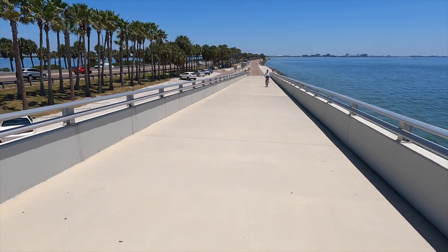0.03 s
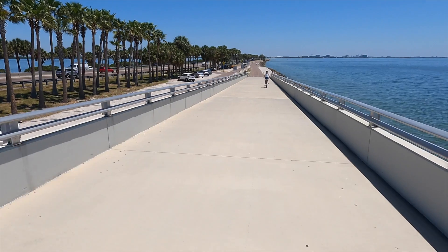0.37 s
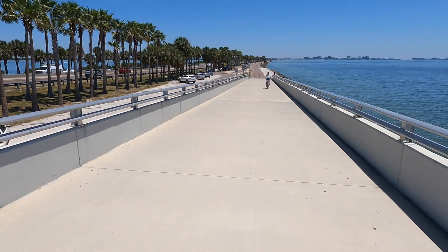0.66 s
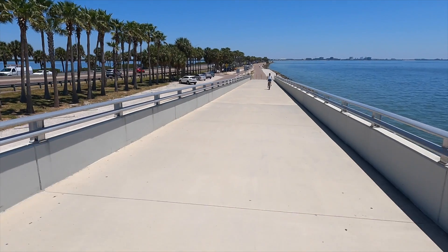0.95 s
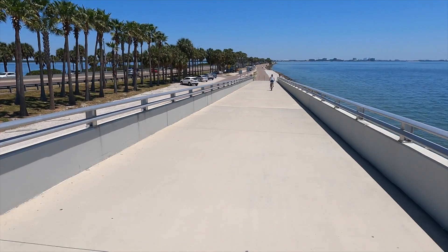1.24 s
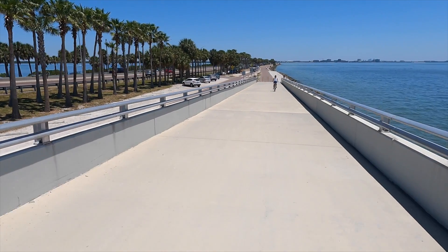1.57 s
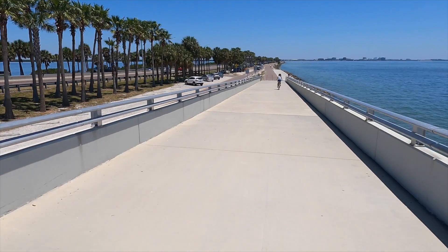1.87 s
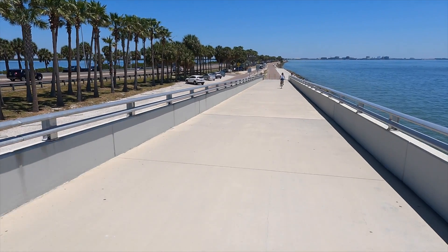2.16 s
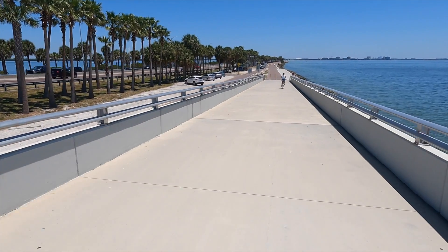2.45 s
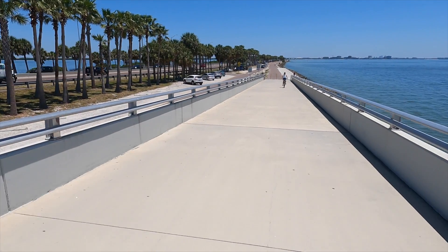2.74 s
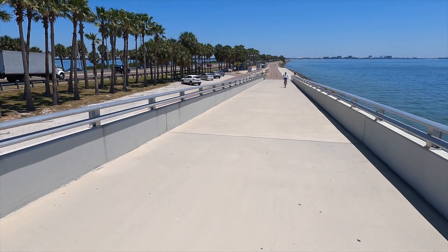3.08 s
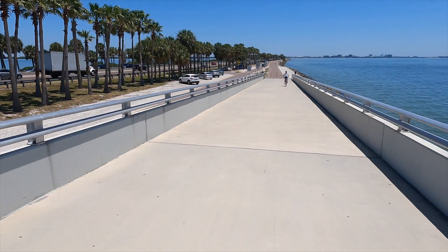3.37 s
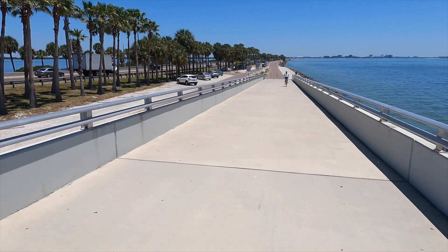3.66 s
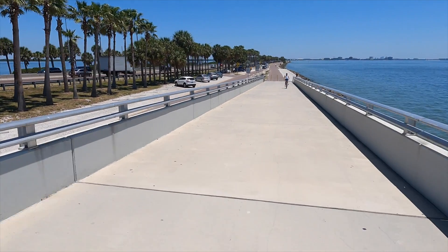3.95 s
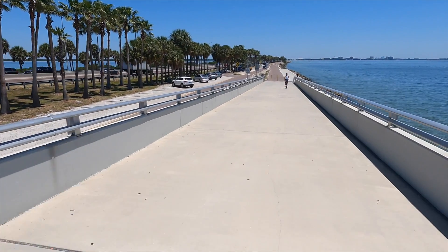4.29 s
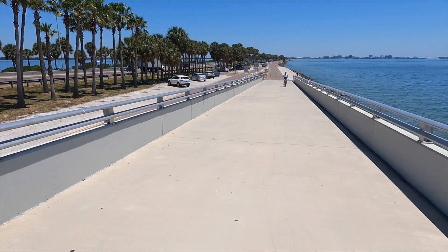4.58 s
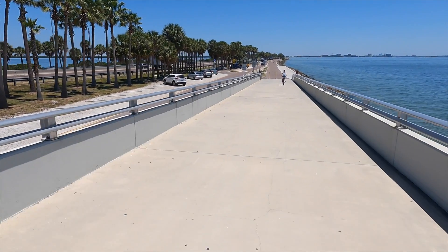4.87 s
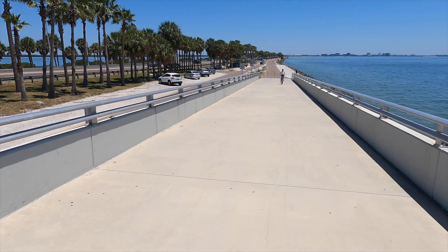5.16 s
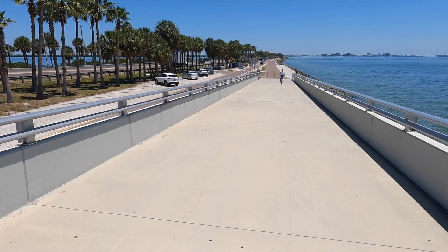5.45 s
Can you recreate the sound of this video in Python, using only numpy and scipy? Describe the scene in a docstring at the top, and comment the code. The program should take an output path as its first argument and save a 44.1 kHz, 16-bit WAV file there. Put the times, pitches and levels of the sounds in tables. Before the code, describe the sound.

Inline skates roll on an outdoor concrete path for about five and a half seconds, heard from a microphone moving with the skater. The wheels give a continuous grainy rumble with a ringing rasp, light hiss and a faint wavering hum that sinks slightly. Throughout, wind buffets the microphone in deep, irregular, throbbing gusts.

Light clicks from the gear come between 0.5 and 1.6 seconds, and the wheels clatter quickly over a slab joint around 1.3 seconds, with dull thuds and small metallic clacks. The rolling then runs evenly, with faint bumps near 2.7 and 4 seconds, and eases a little after 4.3 seconds. One loud, sharp click sounds at about 4.9 seconds, followed by a second brief clatter at 5.2 seconds. From 5 seconds a faint, thin whistle wavers and falls slightly, while the wind keeps gusting to the end.

```python
"""On a concrete seaside path, inline skates roll along, heard from a camera riding with the skater.
The grainy concrete shakes the wheels and keeps the gear ringing, over a hum that sinks as they slow.
The wheels clatter over slab joints, the gear clicks (once loudly), and a thin whistle comes up
at the end. All the while, gusts of wind buffet the microphone."""
import sys
import numpy as np
from scipy import signal
from scipy.fft import rfft, irfft, next_fast_len
from scipy.io import wavfile
from scipy.ndimage import map_coordinates

SR = 44100
rng = np.random.default_rng(int(sys.argv[2]) if len(sys.argv) > 2 else 0)


def master(y):
    """Save y as 16-bit WAV."""
    cut = np.clip(np.atleast_2d(y).T, -1, 1)
    pcm = np.round(cut * 32767)  # scale
    wavfile.write(sys.argv[1], SR, pcm.astype(np.int16))


N = 247842

# how hard the concrete shakes the wheels: (time [s], level [dB])
SHAKING = [(0, -1), (.3, -1), (.45, 1), (.84, -2.5), (.94, 1.5), (1.15, 3), (1.45, 1), (1.6, 4), (2.3, 1),
           (3.05, 0.5), (3.4, -1.5), (4.3, 0), (4.7, -5), (5.08, 1), (5.3, -2), (5.6, -0.5)]
# the rolling sound drifts between two tones: (time [s], share of the second tone [0-1])
TONE_DRIFT = [(0, 0), (1.5, 0), (2.6, 0.63), (4.3, 0.6), (5.1, 0.8), (5.6, 0.9)]
# the low rumble of rolling: (frequency [Hz], level [dB])
RUMBLE_SPECTRUM = [(70, -10.5), (140, 4), (220, 3.5), (265, 0), (315, 3.5), (400, -2.5), (500, -4),
                   (680, 0), (790, 1.5), (900, -13.5), (1300, -29.5)]
# where the gear rings, low to high: (frequency [Hz], width [Hz], first tone [dB], second tone [dB])
RING_BANDS = [(973, 94, -6, -5), (1035, 30, 1.5, -0.5), (1090, 28.3, 2, 4.5), (1136, 62, -8.5, -8.5),
              (1388, 160, -14.5, -13), (1524, 57, -10, -13.5)]
RASP_BANDS = [(1750, 140, -3.5, -2.5), (1900, 70, -14, -1), (2052, 51, 3.5, -11), (2170, 190, -9, -6),
              (2493, 160, -0.5, -3), (3020, 160, -6.5, 0), (3157, 140, -3, -4.5)]
HISS_BANDS = [(3480, 310, -3.5, -3), (3880, 130, -4, -7), (4307, 150, 0.5, -3), (4640, 190, -1, 3),
              (4900, 240, -12.5, -1.5), (5473, 160, -0.5, 3.5), (6215, 130, -10, -3),
              (6610, 220, -13.5, -8.5), (6900, 260, -18.5, -10), (7480, 170, -17.5, -9.5)]
# a narrow whine in the rolling noise: (time [s], level [dB])
WHINE_LEVELS = [(0, -51), (.9, -60), (1.15, -52.5), (1.55, -57.5), (1.8, -67.5), (2.5, -66.5), (2.9, -51.5),
                (3.25, -60.5), (3.5, -53.5), (3.88, -50.5), (4.2, -52.5), (4.4, -48.5), (4.7, -56.5),
                (5, -54.5), (5.6, -64)]
# the tone of that whine: (frequency [Hz], level [dB])
WHINE_SPECTRUM = [(1900, -40.5), (2150, -12.5), (2240, -1), (2315, 0), (2400, -5), (2480, -14),
                  (2750, -37.5)]
# a wheel hits a joint or bump: (time [s], thud [dB], clack [dB], scuff [dB], time to fade 60 dB [s])
JOINT_HITS = [(0.915, -34, -44.5, -54, 0.029), (1.142, -37, -37.5, -51, 0.11),
              (1.261, -42, -46, -42.5, 0.038), (1.265, -33, -39.5, -40, 0.046),
              (1.28, -35.5, -37, -45, 0.066), (1.296, -34, -31, -44, 0.051),
              (1.306, -27.5, -30, -41, 0.028), (1.3115, -23.5, -34.5, -43.5, 0.047),
              (1.315, -31, -29, -37.5, 0.025), (1.32, -31.5, -32, -37.5, 0.03),
              (1.339, -29.5, -34, -46.5, 0.076), (1.347, -33, -39, -46, 0.055),
              (1.5167, -36.5, -40, -51, 0.027), (1.527, -34, -34.5, -53, 0.029),
              (1.6175, -33.5, -34, -56.5, 0.03), (1.622, -44, -36.5, -57, 0.022),
              (2.716, -47, -56, -50, 0.08), (4.023, -38, -49, -47, 0.07), (5.192, -29, -42.5, -42, .03),
              (5.198, -44.5, -38, -44, .04), (5.2117, -23, -32, -40.5, 0.032),
              (5.2239, -23.5, -33, -39, 0.035), (5.229, -33, -31.5, -36, 0.051),
              (5.2375, -34.5, -33, -41, 0.032), (5.2442, -30, -29, -40, .035),
              (5.252, -44.5, -32.5, -44.5, 0.06)]
# the three parts of such a hit: (frequency [Hz], level [dB])
THUD_SPECTRUM = [(80, -30), (170, 5), (320, -7), (560, -6.5), (900, -13.5), (2000, -34.5)]
CLACK_SPECTRUM = [(500, -31), (850, -9), (1100, 7), (1320, -5), (1550, 1.5), (2000, -4.5), (2450, -0.5),
                  (2800, -9.5), (3150, -4.5), (3700, -22)]
SCUFF_SPECTRUM = [(2200, -27.5), (2950, -6), (3300, -0.5), (3600, -6), (4000, -7), (4400, 1.5), (4720, -5),
                  (4950, -6.5), (5400, 1), (5780, -12), (6080, -2), (6300, -9.5), (6520, -7.5), (7200, -13),
                  (7620, -10.5), (8200, -24.5), (9500, -31.5), (11000, -45)]
# knocks on a wheel frame, and clicks of the gear: (time [s], level [dB], treble tilt [dB per octave])
FRAME_KNOCKS = [(1.263, -41, -14), (1.305, -40, -1), (1.315, -46.5, 10), (1.321, -44.5, -2),
                (5.227, -40.5, 12), (5.2464, -32.5, -3.5)]
GEAR_CLICKS = [(0.503, -27, -10), (1.011, -23.5, -8), (1.241, -24.5, -7), (1.524, -23, -8),
               (1.622, -24.5, -8), (4.865, -14, -0.5), (4.88, -35, 4.5), (4.923, -30.5, -3)]
# the notes a knock and a click ring with: (frequency [Hz], level [dB], time to fade 60 dB [s])
FRAME_NOTES = [(3060, -9, .04), (3340, -8, .045), (4440, -9, .05), (4640, 0, .06), (6130, -11, .04),
               (6520, -15, .045), (7520, -17, .035)]
CLICK_NOTES = [(650, -16.5, 0.045), (1059, 3, 0.023), (1590, -11, 0.024), (2280, -16, 0.024),
               (2660, -13.5, 0.024), (2800, -15.5, 0.034), (3140, -8.5, 0.033), (4500, -17.5, .014),
               (4900, -19, 0.014), (5250, -27, .016), (5530, -24, 0.03), (7600, -32, 0.01)]
# the hum of the wheels: (time [s], low note [dB], its octave [dB])
HUM_LEVELS = [(0, -73, -68), (.45, -58, -73.5), (.93, -51.5, -62.5), (1.5, -48.5, -59), (1.9, -60, -57.5),
              (2.35, -49.5, -57), (3, -59, -58), (4.2, -61, -55), (4.6, -54.5, -67), (5.6, -81.5, -69.5)]
# the thin whistle: (time [s], pitch [Hz], level [dB])
WHISTLE_PATH = [(5, 3130, -75), (5.06, 3110, -57), (5.11, 3050, -52.5), (5.18, 3028, -61),
                (5.26, 3020, -57), (5.3, 2941, -57), (5.34, 2925, -54), (5.385, 2946, -51.5),
                (5.425, 2972, -56), (5.47, 2942, -56), (5.53, 2908, -62), (5.6, 2885, -57)]
# the wind's steady push between gusts, and its flutter: (time [s], level [dB])
WIND_LEVELS = [(0, -15), (.26, -29.5), (.46, -27), (.56, -38), (.7, -28.5), (1.2, -24), (1.39, -30.5),
               (1.52, -25), (1.8, -25), (2.45, -31), (2.85, -26.5), (3.1, -30), (3.5, -26.5), (3.88, -25.5),
               (4.25, -24.5), (4.55, -29.5), (4.88, -24), (5.2, -24.5), (5.3, -32), (5.6, -26)]
FLUTTER_LEVELS = [(0, -34), (.46, -32), (.57, -38.5), (.7, -41.5), (.87, -28.5), (.99, -33), (1.14, -31.5),
                  (1.33, -32.5), (1.48, -36.5), (1.6, -31), (1.72, -32.5), (1.82, -32), (2.1, -32),
                  (2.26, -31), (2.46, -41.5), (2.63, -33.5), (2.76, -41), (3, -30.5), (3.12, -34.5),
                  (3.66, -31), (3.8, -37.5), (4.03, -36), (4.14, -29), (4.57, -36), (4.85, -31.5),
                  (4.97, -42), (5.06, -34.5), (5.43, -45.5), (5.6, -35)]
# gusts, the last one cut off abruptly as the sound ends: (peak time [s], length [s], level [dB])
WIND_GUSTS = [(0.116, 0.079, -22), (0.174, 0.087, -16), (0.396, 0.023, -11.5), (0.89, 0.081, -30),
              (1.035, 0.059, -24), (1.128, 0.066, -16.5), (1.273, 0.074, -16), (1.678, 0.068, -18.5),
              (1.827, 0.034, -20), (1.868, 0.021, -13), (1.925, 0.015, -14), (2.012, 0.048, -15),
              (2.12, 0.14, -16), (2.263, 0.057, -15.5), (2.39, 0.16, -17), (2.534, 0.017, -16),
              (2.615, 0.032, -16), (2.699, 0.033, -13), (3.069, 0.092, -15), (3.212, 0.043, -24),
              (3.293, 0.065, -21.5), (3.35, 0.05, -15), (3.422, 0.028, -19), (3.6, 0.041, -15.5),
              (4.017, 0.049, -14.5), (4.123, 0.042, -16.5), (4.315, 0.022, -15), (4.427, 0.077, -13),
              (4.471, 0.062, -14.5), (4.615, 0.077, -16.5), (4.738, .04, -26), (4.818, 0.047, -17),
              (4.975, 0.023, -12.5), (5.038, 0.029, -19), (5.097, 0.042, -16), (5.163, .04, -22.5),
              (5.374, 0.053, -15.5), (5.441, 0.053, -22), (5.531, 0.083, -15.5), (5.627, 0.058, -10.5)]
# moments when the wind lets go: (time [s], length [s], level change [dB])
WIND_LULLS = [(0.041, 0.038, -13), (0.234, 0.023, -19), (0.437, 0.017, -7), (0.97, 0.027, -8),
              (1.4, 0.075, -1.5), (1.777, 0.016, -8), (1.98, .025, -8), (2.054, .02, -10.5),
              (2.3, 0.018, -9), (2.83, .05, -5.5), (3.439, 0.014, -13), (3.733, 0.06, -9),
              (3.882, 0.047, -10), (4.215, 0.027, -16), (5.497, .025, -12.5)]
# large and small swirls of air on the microphone: (frequency [Hz], level [dB])
THROB_SPECTRUM = [(12, -23), (21, -24), (29, -12), (36.5, -4), (44, 0), (51, -5.5), (60, -15), (78, -41),
                  (140, -90.5)]
FLUTTER_SPECTRUM = [(45, -37), (62, -10), (75, 2.5), (87, -3), (100, -14), (115, -16), (137, -24.5),
                    (200, -37.5), (500, -68)]
# which of the microphone's two openings is louder: (frequency [Hz], left minus right [dB])
STEREO_BALANCE = [(300, 0), (480, 2.5), (620, 2.5), (820, 5.5), (980, 6.5), (1150, 6), (1370, 3.5),
                  (1520, 4.5), (1680, -0.5), (1900, -6), (2060, 7), (2270, -5.5), (2450, 4.5), (2650, 1),
                  (3050, 0.5), (3250, 4), (3430, -0.5), (3700, 3), (3900, -2.5), (4450, -5), (4700, -2.5),
                  (5500, -0.5), (6400, -1), (8000, 3)]
# how far the left wave runs ahead of the right: (frequency [Hz], phase [radians])
LEFT_LEAD = [(520, 0.19), (860, -0.48), (1200, -.38), (1420, 0.4), (1950, .15), (2200, -0.4), (2450, 0.011),
             (2650, -1.1), (2790, -0.084), (2930, -1.15), (3190, -1.1), (3380, 0.24), (3670, 0.78),
             (4000, -.6), (4150, -0.12)]
# how alike left and right sound: (frequency [Hz], likeness [0-1])
STEREO_LIKENESS = [(380, 0.98), (570, 0.82), (1050, 1), (1540, 0.98), (1810, 0.7), (2070, 0.9), (2250, 0.9),
                   (2500, 0.9), (2680, .52), (2900, 0.99), (3130, 0.87), (3450, 0.6), (4000, .5),
                   (4250, .95), (6600, 1), (7100, 0.98), (7600, 0.8)]
# narrow dips that hollow out the treble: (frequency [Hz], width [Hz], level change [dB])
TREBLE_DIPS = [(2560, 40, 0), (2880, 64, -4.5), (3940, 110, -3.5), (4810, 350, -3.5), (5380, 250, -8.5),
               (6600, 100, -2), (7100, 140, -6.5)]

TIME = np.arange(N) / SR
LN_1000 = np.log(1000)  # fading by 60 dB means getting 1000 times smaller
WHEEL_ATTACK_S = 0.001  # how fast a wheel's contact builds


def rolling():
    """The fine grain of the concrete shakes the wheels and keeps the gear ringing."""
    ebb_db = 5 * np.maximum(TIME - 4.3, 0)  # the ring ebbs 5 dB a second after 4.3 s
    ring_db = shaken_db(-38, follow=0.53, drift_db=-0.59) - ebb_db + 0.85 * wobble(7)
    rasp_db = shaken_db(-49.5, follow=0.15, drift_db=0.3) + swell(3.52, 1.8, 2.4) - 0.48 * ebb_db
    hiss_db = shaken_db(-56.5, follow=0.65, drift_db=-0.68) + swell(5.14, 0.6, 1.9)
    patches = amp(0.6 * wobble(70))
    grit = amp(0.75 * wobble(900)) * patches
    lumps_db = wobble(45)  # uneven concrete
    rumble_db = shaken_db(-46, follow=1.15, drift_db=-0.65) + lumps_db
    rumble = amp(rumble_db) * patches * unit(coloured(noise_pair(), RUMBLE_SPECTRUM))
    ring = amp(ring_db) * gear_ringing(noise_pair() * grit, RING_BANDS, low_hz=790, high_hz=1716)
    rasp = amp(rasp_db) * gear_ringing(noise_pair() * grit, RASP_BANDS, low_hz=1490, high_hz=3330)
    hiss = amp(hiss_db) * gear_ringing(noise_pair() * grit, HISS_BANDS, low_hz=3400, high_hz=8390)
    whine = amp(curves(WHINE_LEVELS)[0]) * unit(coloured(noise_pair() * grit, WHINE_SPECTRUM))
    return rumble + ring + rasp + whine + hiss


def shaken_db(base_db, follow, drift_db):
    """A layer's level follows the shaking of the wheels and the drift of the tone."""
    return base_db + follow * curves(SHAKING)[0] + drift_db * curves(TONE_DRIFT)[0]


def gear_ringing(x, bands, low_hz, high_hz):
    """The gear picks its own bands out of the shaking x, drifting between two tones."""
    centre, width, *tones_db = np.transpose(bands)[:, :, None]
    grid_hz = np.linspace(0, SR / 2, 4096)
    outside_cut = (1 + (low_hz / (grid_hz + 1)) ** 16) * (1 + (grid_hz / high_hz) ** 36)
    off_centre = 1 + (2 * (grid_hz - centre) / width) ** 2
    gains = [np.sqrt(np.sum(amp(db) ** 2 / off_centre, axis=0) / outside_cut) for db in tones_db]
    first, second = [unit(shaped(x, lambda hz: np.interp(hz, grid_hz, gain))) for gain in gains]
    share = curves(TONE_DRIFT)[0]
    return (1 - share) * first + share * second


def slab_joints():
    """A wheel dropping into a joint gives a push, a dull thud, a clack of the frame and a bright scuff."""
    power, pushes = np.zeros((3, N)), np.zeros(N)
    t = np.arange(SR // 4) / SR
    for start_s, *levels_db, fade_s in JOINT_HITS:
        at = round(start_s * SR)
        for part, db in zip(power, levels_db):
            part[at:][:len(t)] += (amp(db) * hit_shape(t, fade_s)) ** 2
        pushes[at] += amp(levels_db[0] + 29)  # a solid push starts each thud
    spectra = THUD_SPECTRUM, CLACK_SPECTRUM, SCUFF_SPECTRUM
    direct, diffuse = sum(np.sqrt(part) * unit(coloured(noise_pair(), spectrum))
                          for part, spectrum in zip(power, spectra))
    return np.array([direct + coloured(pushes, THUD_SPECTRUM), diffuse])


def frame_knocks():
    """The hardest knocks at the joints ring the metal wheel frames."""
    out, t = np.zeros(N), np.arange(SR // 8) / SR
    for hz, note_db, fade_s in FRAME_NOTES:
        tone = sine(hz * (1 + 0.0021 * wobble(400))) / np.sqrt(2)  # the loose frame's pitch shivers
        octaves = np.log2(hz / FRAME_NOTES[3][0])  # above the strongest note
        for start_s, db, tilt in FRAME_KNOCKS:
            at = round(start_s * SR)
            strength = amp(db + note_db + tilt * octaves)
            out[at:][:len(t)] += strength * hit_shape(t, fade_s) * tone[at:][:len(t)]
    return out


def gear_clicks():
    """Hard contacts make the gear ring very briefly."""
    out, t = np.zeros(N), np.arange(SR // 8) / SR
    rise = (1 - np.exp(-t / 0.0005)) ** 2
    for hz, note_db, fade_s in CLICK_NOTES:
        note = rise * np.exp(-LN_1000 * t / fade_s) * np.sin(2 * np.pi * hz * t)
        octaves = np.log2(hz / CLICK_NOTES[1][0])  # above the strongest note
        for start_s, db, tilt in GEAR_CLICKS:
            out[round(start_s * SR):][:len(t)] += amp(db + note_db + tilt * octaves) * note
    return out


def wheel_hum(start_hz=361.8, floor_hz=336, coast_s=2.1):
    """The spinning wheels hum with a wavering note and its octave, sinking as they slow."""
    low_db, octave_db = curves(HUM_LEVELS)
    pitch_hz = floor_hz + (start_hz - floor_hz) * np.exp(-TIME / coast_s)
    pitch_hz *= 1 + 0.0058 * wobble(60)
    low = amp(low_db + 3.3 * wobble(18)) * sine(pitch_hz)
    octave = amp(octave_db + 1.5 * wobble(8)) * sine(2 * pitch_hz)
    return low + octave


def whistle(squeal_hz=5800):
    """A faint whistle swells twice and sinks in pitch; a higher, rougher squeal joins at the end."""
    pitch_hz, level_db = curves(WHISTLE_PATH)
    tone = amp(level_db) * sine(pitch_hz * (1 + 0.001 * wobble(90)))
    squeal = swell(5.55, 0.19, amp(-69)) * sine(squeal_hz * (1 + 0.004 * wobble(300)))
    flicker = amp(0.8 * wobble(27))
    return flicker * (tone + squeal)


def wind():
    """Large swirls of air throb on the microphone, steadily and in gusts; small ones flutter above."""
    large = swirls(THROB_SPECTRUM, rise_hz_per_s=0.55)
    steady = amp(curves(WIND_LEVELS)[0] + 1.5 + 2.5 * wobble(24))
    gust_power = sum(swell(peak_s, length_s, amp(db)) ** 2 for peak_s, length_s, db in WIND_GUSTS)
    gusts = np.sqrt(steady ** 2 + gust_power) - steady
    buffet = steady * throb(large, evenness=1.7) + gusts * throb(large, evenness=5.9)
    buffet *= amp(sum(swell(*lull) for lull in WIND_LULLS))
    # keep only the deep bass, about 27 to 82 Hz
    buffet = filtered(buffet, lambda hz: 1 / np.hypot(1, (hz / 82) ** 5)
                      / np.hypot(1, (27 / (hz + 1)) ** 6))
    flutter_db = curves(FLUTTER_LEVELS)[0] - 0.5 * wobble(11)
    flutter = amp(flutter_db) * throb(swirls(FLUTTER_SPECTRUM, rise_hz_per_s=2.2), evenness=0.58)
    # a little of the pressure differs between left and right
    side = amp(-65.5) * air_noise(THROB_SPECTRUM) + amp(-75.5) * air_noise(FLUTTER_SPECTRUM)
    return buffet + flutter + np.array([side, -side])


def air_noise(spectrum):
    """Random air pressure with this spectrum, at strength 1."""
    return unit(coloured(rng.standard_normal(N), spectrum))


def swirls(spectrum, rise_hz_per_s):
    """Swirling air that slowly quickens, as complex numbers whose size is its strength."""
    return signal.hilbert(air_noise(spectrum)) * np.exp(1j * np.pi * rise_hz_per_s * TIME ** 2)


def throb(swirl, evenness):
    """Even out the swirls' swings, so that the wind sets their size."""
    return unit(swirl.real / np.hypot(np.abs(swirl), 1 / evenness))


def microphone(direct, diffuse, bass_hz=480):
    """The left and right openings hear each frequency at their own level and phase."""
    sides = np.array([[0.5], [-0.5]])

    def apart(hz):  # long bass waves reach both openings nearly alike
        return np.minimum(hz / bass_hz, 1)

    def spread(hz):
        return apart(hz) * np.arccos(np.clip(look_up(STEREO_LIKENESS, hz), 0, 1)) / 2

    def openings(hz):
        phase = sides * apart(hz) * look_up(LEFT_LEAD, hz)
        return amp(sides * look_up(STEREO_BALANCE, hz)) * np.exp(1j * phase)

    mid = filtered(direct, lambda hz: np.cos(spread(hz)))
    side = filtered(diffuse, lambda hz: np.sin(spread(hz)))
    return filtered(np.array([mid + side, mid - side]), openings)


def amp(db):
    """Turn decibels into a number to multiply by."""
    return 10 ** (np.asarray(db) / 20)


def unit(x):
    """Scale x to an average strength (rms) of 1."""
    return x / np.sqrt(np.mean(x ** 2) + 1e-20)


def look_up(table, hz):
    """Read a (frequency, value) table at hz, on a scale of octaves."""
    frequencies, values = np.transpose(table)
    return np.interp(np.log(hz + 1), np.log(frequencies + 1), values)


def curves(table):
    """One value per sample for each column after the time."""
    times, *columns = np.transpose(table)
    return [np.interp(TIME, times, column) for column in columns]


def wobble(per_s):
    """A smooth curve through per_s random values a second."""
    return map_coordinates(rng.standard_normal(8192), [TIME * per_s], mode="wrap")


def swell(peak_s, length_s, height):
    """A smooth hump, length_s wide at half its height."""
    return height * 0.5 ** np.minimum((2 * (TIME - peak_s) / length_s) ** 2, 50)


def hit_shape(t, fade_s):
    """A wheel's hit builds fast, then fades by 60 dB in fade_s."""
    return (1 - np.exp(-t / WHEEL_ATTACK_S)) * np.exp(-LN_1000 * t / fade_s)


def sine(hz):
    """A pure tone of strength 1 on a moving pitch."""
    return np.sqrt(2) * np.sin(2 * np.pi * np.cumsum(hz) / SR)


def noise_pair():
    """Two unrelated white noises: the direct sound and its diffuse (scattered) part."""
    return rng.standard_normal((2, N))


def filtered(x, response):
    """Multiply each frequency in x by response(hz)."""
    size = next_fast_len(N + SR // 2)
    return irfft(rfft(x, size) * response(np.fft.rfftfreq(size, 1 / SR)), size)[..., :N]


def shaped(x, gain):
    """Filter x by gain(hz) so that it rings only after a sound, never before."""
    def response(hz):
        cepstrum = irfft(np.log(np.maximum(gain(hz), 1e-6)))
        half = len(cepstrum) // 2
        return np.exp(rfft(np.r_[cepstrum[0], 2 * cepstrum[1:half]], len(cepstrum)))
    return filtered(x, response)


def coloured(x, spectrum):
    """Shape x by a (frequency, level) table, falling away past its last row."""
    return shaped(x, lambda hz: amp(look_up(spectrum, hz)) / np.maximum(1, hz / spectrum[-1][0]) ** 4)


def scene():
    """The skates in stereo, with the wind on top."""
    direct, diffuse = rolling() + slab_joints()
    direct = direct + wheel_hum() + whistle() + frame_knocks() + gear_clicks()
    return microphone(direct, diffuse) + wind()


def record(dry, top_hz=12000):
    """Narrow dips hollow out the treble, and the camera loses the very highest sounds."""
    def response(hz):
        dips_db = sum(db * np.exp(-(2 * (hz - centre) / width) ** 2)
                      for centre, width, db in TREBLE_DIPS)
        return amp(dips_db) / np.hypot(1, (hz / top_hz) ** 24)
    return filtered(dry, response)


dry = scene()
out = record(dry)
master(out)
```